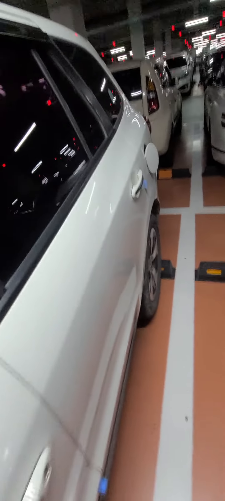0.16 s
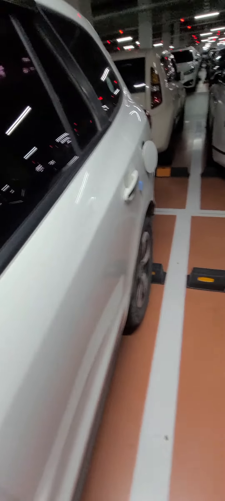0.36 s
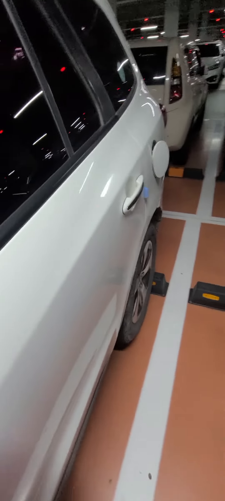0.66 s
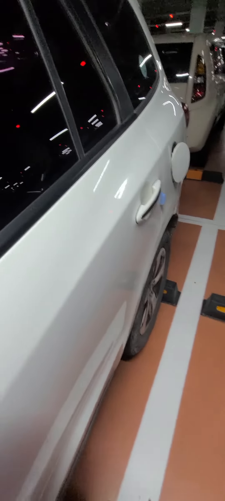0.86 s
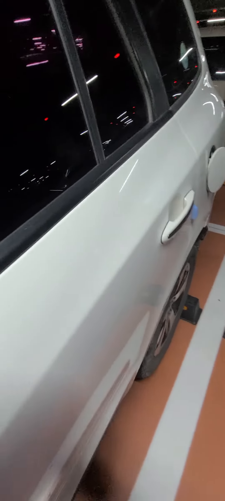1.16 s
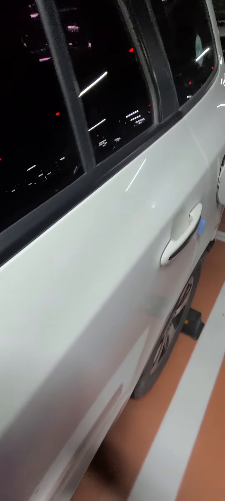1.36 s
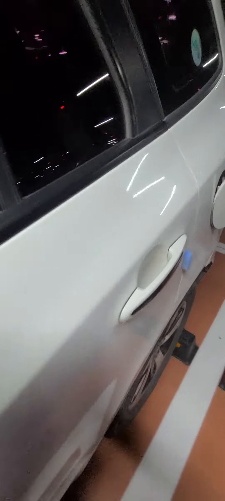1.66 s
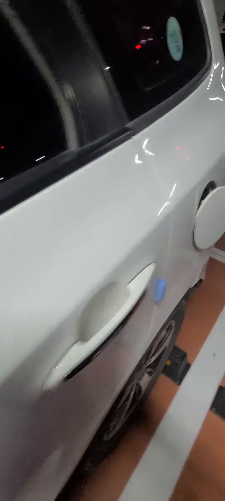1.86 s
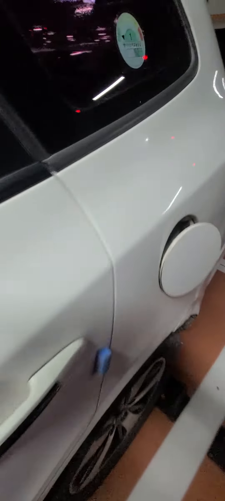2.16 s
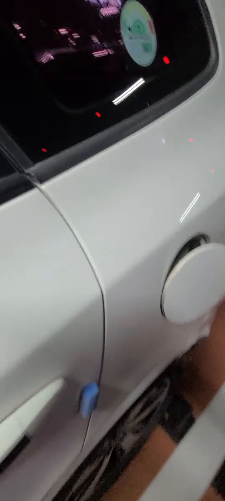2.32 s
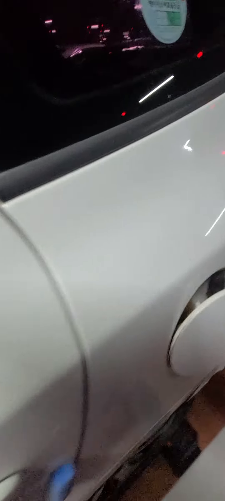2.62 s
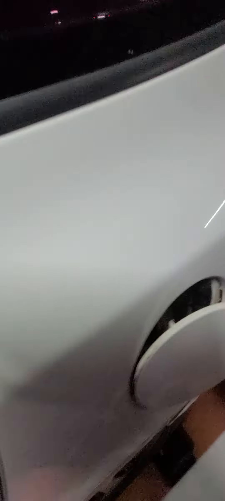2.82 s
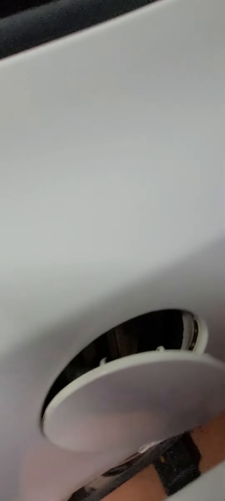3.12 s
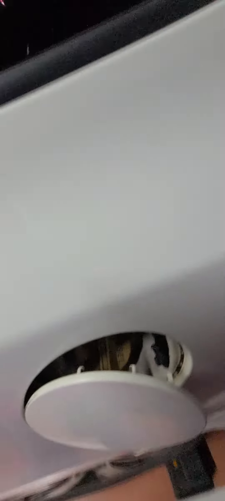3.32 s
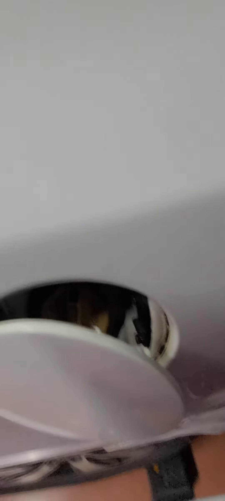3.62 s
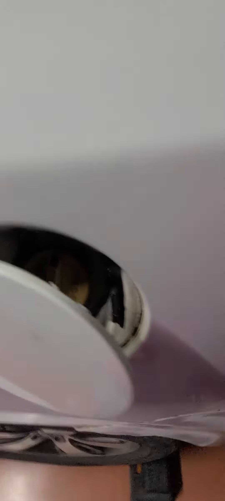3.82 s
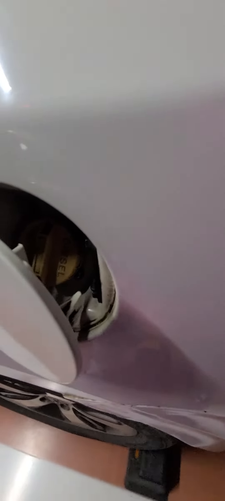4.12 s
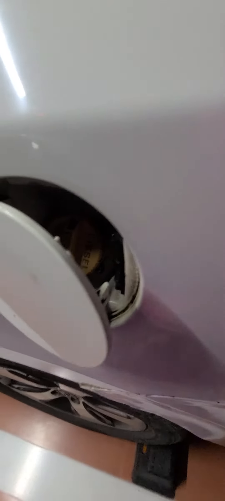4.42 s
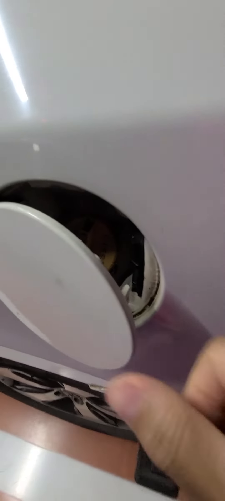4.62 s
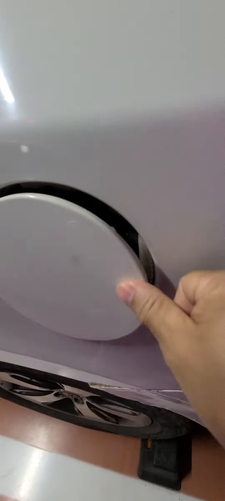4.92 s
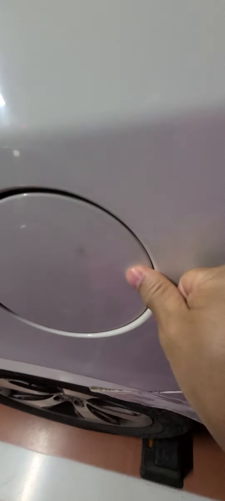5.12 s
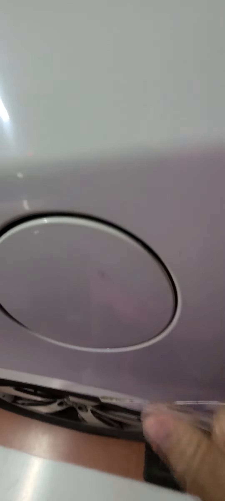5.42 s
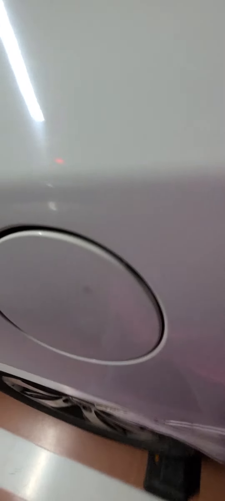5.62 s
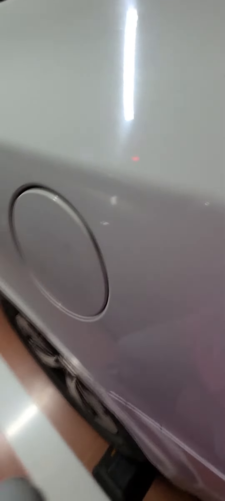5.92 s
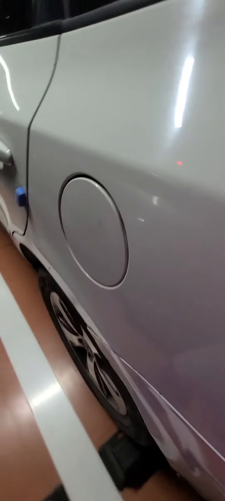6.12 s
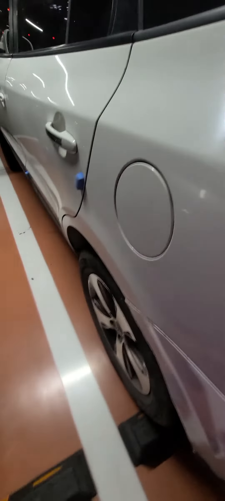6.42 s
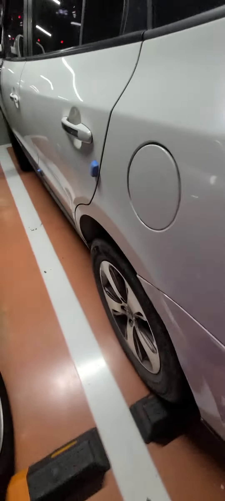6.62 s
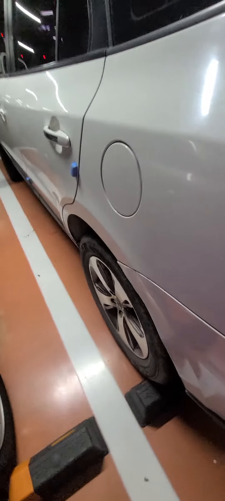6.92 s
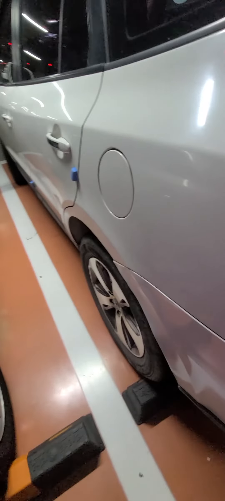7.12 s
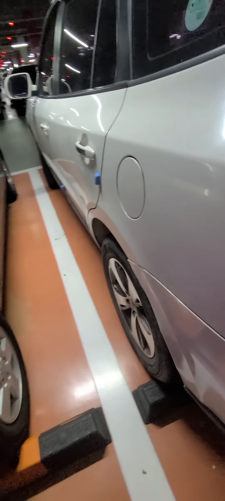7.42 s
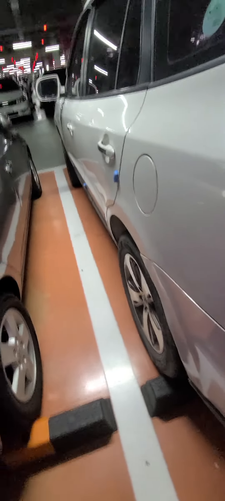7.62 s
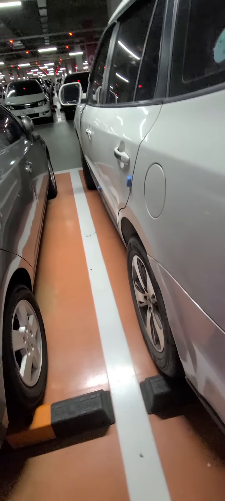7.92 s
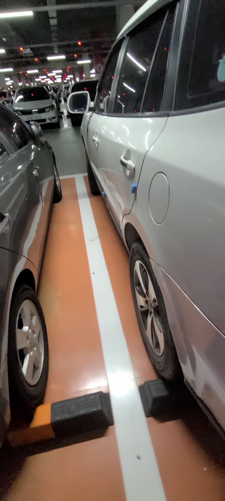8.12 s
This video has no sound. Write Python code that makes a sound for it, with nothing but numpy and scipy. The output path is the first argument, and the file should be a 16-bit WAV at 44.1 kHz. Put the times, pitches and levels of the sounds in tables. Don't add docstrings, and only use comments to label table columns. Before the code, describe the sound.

Very close stereo handheld microphone in a concrete garage. Fabric brushes and swishes, with dry snaps and sole ticks, one very sharp near two seconds. Clusters of crackles lead to a hard, hollow knuckle rap on car metal, then a softer knock, then a fuel flap pushed shut with a clack. Quieter swishes, a few faint ticks and two tiny key clinks follow over a faint low rumble.

```python
import sys
import numpy as np
from scipy import signal
from scipy.fft import rfft, irfft, next_fast_len
from scipy.io import wavfile
from scipy.ndimage import uniform_filter1d, map_coordinates

SR = 44100
rng = np.random.default_rng(int(sys.argv[2]) if len(sys.argv) > 2 else 0)


def ratio(d):
    e = np.asarray(d, float) / 20
    return 10 ** e


def materialize(psi):
    bounded = np.clip(np.atleast_2d(psi).T, -1, 1)
    quanta = np.round(bounded * 32767).astype(np.int16)
    wavfile.write(sys.argv[1], SR, quanta)


N = 364266

# (frequency [Hz], density [dB per Hz])
WEAVE_SPECTRUM = [(410, -50.5), (700, -10.5), (1050, -4), (2300, -7), (3190, -5.5), (5500, -16.5),
                  (7150, -22.5), (12100, -120)]
SHEEN_SPECTRUM = [(2240, -19.5), (3800, -7.5), (5000, -4), (7000, 0), (8300, -12.5), (11900, -10.5),
                  (15100, -14), (16400, -39)]
BODY_SPECTRUM = [(82, -50.5), (140, -22), (237, -12), (422, -9.5), (650, -11), (1100, -20.5), (1430, -13),
                 (2420, -120)]
RUMBLE_SPECTRUM = [(12, -44.5), (20, -20), (38, -4), (70, 1), (166, -13), (220, -11), (290, -32.5),
                   (480, -120)]
# (frequency [Hz], correlation [0-1])
PORT_LIKENESS = [(40, 0.23), (120, 0.64), (400, 1), (1500, 0.25), (4000, 0.15), (9000, 0.07), (15000, 0.16)]
# (frequency [Hz], level [dB])
CRACKLE_SPECTRUM = [(250, -29), (700, -3.5), (1500, 2.5), (3500, -3), (5000, -7.5), (8000, -27.5),
                    (16000, -62.5)]
EDGE_SPECTRUM = [(2500, -31.5), (5000, -6.5), (7200, 0), (8500, -13.5), (13000, -15), (16000, -30.5)]
# (frequency [Hz], t60 [s])
HALL_DECAY = [(150, 0.39), (1000, 0.21), (5000, 0.26), (14000, 0.04)]
# (time [s], left over right [dB])
BEARING = [(0.0, -9), (0.16, 3), (0.51, -7), (0.73, 6), (0.94, -17), (2.07, -3.5), (3.15, -10.5),
           (3.57, -5.5), (3.86, -15), (4.37, 2.5), (4.42, -19.5), (5.2, 2.5), (5.22, 5), (6.99, -4),
           (7.57, -14), (8.26, -4.5)]

# (peak time [s], rise [s], fall [s], swish [dB], sheen over swish [dB])
LOOSE_STROKES = [
    (.36, 0.057, .08, -60, -16),
    (.49, 0.11, 0.21, -46, -23.5),
    (.585, 0.06, 0.042, -45, -8.5),
    (1.39, 0.047, 0.3, -63.5, -3),
    (2.7, 0.049, 0.088, -47.5, -13),
    (3.11, 0.079, 0.13, -53.5, -17.5),
    (3.6, 0.26, 0.32, -56.5, -9),
    (4.07, 0.24, 0.173, -52, -10),
    (5.8, 0.071, 0.073, -48.5, -10),
    (6.7, 0.062, 0.039, -50, -16),
]
# (peak time [s], rise [s], fall [s], swish [dB], sheen over swish [dB])
TAUT_STROKES = [(0.0, .05, 0.16, -55, -16), (1.98, 0.22, 0.23, -39, -14), (2.3, 0.12, 0.99, -55.5, -10.5),
                (2.55, 0.11, 0.23, -50, -8.5), (2.92, 0.18, 0.23, -52, -2), (3.28, 0.21, 0.16, -41, -7),
                (3.88, 0.46, 0.21, -50.5, -3.5), (4.47, 0.12, 0.13, -58.5, -3.5),
                (5.5, 0.12, 0.29, -59, -4), (5.93, 0.11, 0.058, -48, -4.5), (6.26, 0.21, 0.24, -44, -7.5),
                (6.6, 0.12, 0.2, -51.5, -8.5), (6.85, 0.21, 0.3, -63, -1.5), (7.52, 0.36, 0.39, -61, -3.5),
                (8.11, 0.1, 0.1, -55, -11), (8.26, 0.2, 0.11, -72.5, 2)]
# (peak time [s], rise [s], fall [s], swish [dB], sheen over swish [dB])
SLEEVE_STROKES = [
    (.91, 0.058, 0.16, -62, -5),
    (1.02, 0.12, 0.16, -41, -10),
    (1.3, 0.19, 0.17, -42, -14),
]

# (time [s], peak level
# [dB], pitch [Hz], edge above 5 kHz over crackle [dB], hollow thud over crackle [dB])
SNAPS_AND_TICKS = [(0.385, -27, 1130, -17, -9.5), (0.513, -25, 1700, -32, -17), (0.641, -30, 1610, -30.5, -28),
                   (1.464, -22, 1210, -15, -18.5), (1.556, -23.5, 1060, -28, -13.5),
                   (1.6738, -26, 3020, -18, -10.5), (1.903, 0.5, 3500, -10.5, -24),
                   (2.3753, -6, 2020, -8, -11.5), (2.877, -19.5, 2700, -22, -15),
                   (2.8818, -17, 2760, -27.5, -13.5), (2.9222, -5.5, 2830, -21.5, -17),
                   (3.222, -31, 1410, -11.5, -10), (3.355, -17.5, 2770, -20, -11),
                   (3.3725, -12.5, 1910, -15, -11), (3.386, -8.5, 3000, -5.5, -9.5),
                   (3.396, -7.5, 2070, -22, -38), (3.5147, -11.5, 2520, -12, -11.5),
                   (3.642, -6, 1690, -4.5, -10), (4.0968, -41.5, 1180, -16, -1), (4.116, -40, 1590, -24.5, 3),
                   (4.925, -32.5, 1720, -12, -10), (5.473, -36, 2500, -25, -20), (6.504, -37.5, 1076, 5, -3),
                   (6.742, -34, 2766, -0.5, -22), (7.1952, -42, 992, -24, -10), (7.6853, -21, 1800, -11, -17),
                   (7.7272, -38, 4330, 4, -28), (7.745, -20.5, 1180, -30, -9), (7.742, -33, 2900, -12, -19),
                   (2.3764, -3.5, 3600, -15, -27), (7.836, -44.5, 1510, -18, -1), (6.472, -47, 500, -29, 3.5),
                   (7.521, -56, 496.4, -24, 2), (7.795, -59, 1400, -15, -8), (7.898, -50, 1500, -15.5, -2.5),
                   (7.965, -43.5, 1437, -12.5, -4), (8.036, -50, 1720, -17, -6.5), (8.19, -47.5, 460, -26, 1),
                   (0.152, -24, 930, -17, -8.5), (0.823, -49, 600, -18, 1.5), (1.131, -43, 650, -25, -6),
              (1.2072, -32, 1130, -23, -4.5), (1.256, -34.5, 890, -20, -3), (1.3785, -23, 1400, -43, -5),
              (1.76, -16, 3260, -16.5, -6), (1.767, -21, 450, -21, -14), (1.912, -18.5, 415, -29.5, -3),
              (1.717, -39, 2300, -7, -18.5), (1.789, -48, 500, -25, 6), (1.803, -21.5, 706, -34, -5.5),
              (1.818, -50, 500, -25, 2), (1.829, -32, 650, -20, -3), (1.839, -20, 2520, -18, -4.5),
              (1.861, -35, 700, -25, -3), (1.875, -34, 900, -20, 4), (1.881, -34.5, 547, -23, 6.5),
              (2.344, -26, 830, -25, -3), (2.448, -15.5, 3200, -15.5, 0), (2.464, -27.5, 805, -24, 0.5),
              (2.642, -25.5, 1210, -40, -5.5), (2.72, -27, 504, -26, 1.5), (2.7423, -20, 1290, -41, -8.5),
              (2.896, -22.5, 2100, -7, -18), (2.916, -21.5, 900, -25, -7), (3.037, -29.5, 1520, -22, -1.5),
              (3.086, -35, 600, -25, 1), (3.093, -25, 1350, -31, -1), (3.122, -26, 1200, -25, -5.5),
              (3.137, -27, 1920, -23, -5.5), (3.336, -24, 815, -25, -13), (3.5022, -12.5, 2000, -15, -7.5),
              (4.029, -42, 900, -25, 3), (4.042, -28, 1710, -22, -4.5), (4.831, -47, 700, -23, 6),
              (4.958, -36, 1050, -34, 3.5), (6.1795, -41, 1280, -13.5, 3), (7.03, -47.5, 1530, -25, 3),
              (7.1487, -34.5, 1450, -9, -6),]
# (time [s], peak level [dB], pitch
# [Hz], edge over crackle [dB], crackle length [s])
CONTACTS = [(1.239, -26, 5900, -8, 0.0074), (2.37, -15.5, 2030, -22, 0.029),
            (3.577, -8, 1500, -12.5, 0.031), (3.583, -8, 3100, -20.5, 0.053),
            (3.583, -11, 1500, -16, 0.049), (3.592, -13.5, 2220, -8.5, 0.03),
            (4.272, -23.5, 2700, -10, 0.047), (4.285, -15.5, 3100, 4.5, 0.02),
            (4.301, -23.5, 3830, -3.5, 0.034), (5.038, -12.5, 1240, -18.5, 0.058),
            (3.2115, -37.5, 7000, 0, .012), (5.166, -12, 1000, -27, 0.0075),
            (5.176, -16, 1684, -8.5, 0.034), (5.362, -41.5, 5500, -0.5, 0.028),
            (5.369, -44, 1100, -16.5, 0.061), (1.9045, -11, 3300, -21, .014),
            (2.3749, -7, 4870, -20, 0.0075), (2.923, -16, 1230, -18.5, 0.0069),
            (2.389, -30.5, 900, -21, 0.016), (3.574, -29, 4970, -0.5, 0.027),
            (5.06, -39.5, 4000, -2, 0.065), (3.109, -31, 2700, -20, .012)]
# (time [s], peak level [dB], pitch [Hz])
HAND_PUSHES = [(1.229, -34.5, 70.0), (0.514, -51, 97), (1.39, -41, 129), (1.461, -39, 65), (1.759, -35, 85),
               (1.904, -34, 81), (2.449, -35.5, 174), (2.719, -33, 78), (2.919, -25, 72.3),
               (3.083, -27.5, 72.5), (3.108, -25.5, 78), (3.367, -30.5, 198), (3.51, -28.5, 67),
               (3.521, -36.5, 280), (3.931, -46, 183), (3.98, -47, 221), (4.032, -39.5, 178.5),
               (5.43, -38.5, 104.4), (5.717, -50, 51.1), (5.929, -39.5, 66.3), (6.487, -45.5, 79.6),
               (7.189, -45, 131), (0.149, -46, 151), (3.385, -32, 150), (7.15, -42, 90),
               (7.481, -47.5, 104.3), (7.591, -48, 120), (7.69, -43.5, 108.3), (3.12, -30, 90)]
# (start [s], end [s], pitch [Hz], level [dB])
SEAM_DRAGS = [(0.42, 0.538, 1700, -48.5), (.54, 0.585, 1200, -40), (0.98, 1.25, 457, -51.5),
              (1.949, 2.145, 2020, -41), (3.236, 3.325, 1830, -36), (0.39, 0.53, 2200, -53.5),
              (3.556, 3.58, 780, -47), (3.25, 3.31, 2560, -40.5), (.9, 0.94, 3500, -49),
              (7.179, 7.23, 1000, -55.5), (8.027, 8.156, 1960, -58.5), (5.132, 5.175, 3440, -48),
              (5.2, 5.4, 1320, -54.5), (8.07, 8.12, 3400, -58), (4.29, 4.355, 1500, -50),
              (.424, .432, 1500, -48), (.478, .488, 2200, -44.5), (.604, .62, 1100, -50),
              (4.487, 4.498, 1000, -60)]
# (start [s], length [s], from [Hz], to [Hz], peak level [dB])
RIB_SLIDES = [
    (3.07, .18, 11800, 14800, -51),
    (3.28, .055, 4800, 7000, -38),
    (3.295, .03, 10500, 12500, -50),
    (8.155, .1, 6850, 6850, -58),
    (8.18, .055, 9800, 9600, -65),
    (8.17, .065, 14000, 14200, -63),
]
# (time [s], peak level [dB], pitch [Hz], t60 [s])
DAMPED_TAPS = [(5.037, -27, 513, 0.063), (5.04, -38.5, 600, 0.24), (5.039, -38, 350, 0.29),
               (5.046, -23.5, 189, 0.13), (5.129, -24.5, 510, 0.049), (5.136, -26.5, 209, 0.17),
               (3.578, -13, 718, 0.034), (5.335, -36, 683, 0.074), (5.362, -25.5, 179, 0.16),
               (5.338, -27.5, 405, 0.24), (5.367, -7.5, 451, 0.079), (6.142, -37.5, 323, 0.18)]

# (time [s], peak level [dB], contact time [s])
FIRST_BLOWS = [
    (3.589, -7, 0.00037),
    (3.595, -7, 0.00091),
    (3.602, -8, .002),
    (3.624, -17, .006),
]
SECOND_BLOWS = [
    (4.272, -27, 0.0022),
    (4.284, -6, 0.0052),
]
FLAP_BLOWS = [
    (5.157, -24.5, 0.0046),
    (5.1671, -6, 0.00036),
    (5.1734, -10.5, 0.001),
]
# (frequency [Hz], level [dB], t60 [s])
FIRST_MODES = [(108.3, -13.5, 0.38), (189.4, -16.5, 0.35), (315, 5.5, 0.1), (405, 11.5, 0.037),
               (483.6, 10.5, 0.073), (713, -14.5, 0.15), (808, -22, 0.35)]
SECOND_MODES = [(129, -10.5, 0.29), (174, -15, 0.35), (246, -26, 0.51), (307, -7, 0.24),
                (340.8, 2.5, 0.084), (405, -4, 0.15), (468.7, 4.5, 0.2), (646, -30, 0.13), (800, -37, 0.17),
                (890, -39, 0.18), (1180, -43.5, 0.18), (1398, -23.5, 0.077)]
FLAP_MODES = [(136, -24.5, 0.21), (179.2, -21, 0.28), (282.5, -16.5, 0.16), (415, -2.5, 0.29),
              (450, 3, 0.07), (496, -8, 0.21), (672, 2, 0.092), (723, -5, .11), (980, -2.5, 0.048),
              (1134, 0.5, 0.043), (1390, -17, 0.12), (1630, -6, 0.12), (1660, -37.5, .3)]
WING_MODES = [(487, -28.5, 0.94), (304, -39, 0.85)]

# (time [s], peak level [dB])
KEY_CLINKS = [
    (5.699, -43),
    (6.797, -30.5),
]
# (frequency [Hz], level [dB], t60 [s])
KEY_MODES = [(4705, -17, 0.061), (6370, 1.5, 0.02), (9080, -10, 0.024), (10900, -2, 0.014),
             (11760, -14.5, 0.064), (12600, -5, 0.04)]

LOOSE_HZ, TAUT_HZ = (1350, 1720), (2296, 3000)
SLEEVE_HZ = (760, 1210, 1740, 2140, 2670, 3120, 3750)
LOOSE_BODY_DB, TAUT_BODY_DB, SLEEVE_BODY_DB = -26.5, -13.5, -10.5
FOLD_WIDTH, SLEEVE_WIDTH = 0.42, 0.064
FOLD_RING, SLEEVE_RING = 0.63, 1.75
AWAY_S, AWAY_DB = 5.2, 0.5
TAIL_DB, TAIL_RISE_S, TAIL_FALL_S, MURMUR_TOP_HZ = -41.5, 0.093, 0.56, 543
SHAKE_DB, SHAKE_S, FAN_DB = -20.5, 0.072, -64
SNAP_S, STEP, SPREAD = 0.012, 17, 0.98
CONTACT_THUD_DB, THUD_DB_PER_OCTAVE = -3, -18
SLIPS_PER_S, SCRAPE_RISE = 700, 1.093
TAP_ROUGH_DB, TAP_PUFF_DB = 2, -14
PORT_LAG = 19


def unit(x):
    return x / np.sqrt(np.mean(x ** 2) + 1e-20)


def along(points, hz):
    f, v = np.transpose(points)
    return np.interp(np.log(hz + 1), np.log(f + 1), v)


def wobble(rate):
    coarse = np.arange(0, N + 16, 16)
    knots = rng.standard_normal(int(N * rate / SR) + 4)
    return np.interp(np.arange(N), coarse, map_coordinates(knots, [coarse * rate / SR]))


def filtered(x, response):
    n = x.shape[-1]
    m = next_fast_len(n + min(n // 4, 4096))
    return irfft(rfft(x, m) * response(np.fft.rfftfreq(m, 1 / SR)), m)[..., :n]


def peak(f, hz, width_hz):
    return 1j * f * width_hz / (hz * hz - f * f + 1j * f * width_hz)


def add(out, s, pair, lag):
    for ch, shift in enumerate((lag / 2, -lag / 2)):
        part = out[ch, max(round(s * SR + shift), 0):][:pair.shape[1]]
        part += pair[ch, :len(part)]


def swells(peak_s, rise_s, fall_s, db):
    peak_s, rise_s, fall_s, db = [np.reshape(v, (-1, 1)) for v in (peak_s, rise_s, fall_s, db)]
    now = np.arange(0, N / SR + .002, .002)
    since = now - peak_s
    width = np.maximum(np.where(since < 0, rise_s, fall_s), .01)
    power = ratio(db - 20 * (since / width) ** 2) ** 2
    return np.interp(np.arange(N) / SR, now, np.sqrt(np.sum(power, 0)))


def rush(spectrum, patchy_db, grain_db, pan_db):
    grain = ratio(grain_db * wobble(400))
    z = signal.stft(grain * rng.standard_normal((2, N)), nperseg=512)[2]
    field = uniform_filter1d(rng.standard_normal(z.shape[1:]), size=3, axis=0)
    field = uniform_filter1d(field, size=10, axis=1)
    pair = signal.istft(z * ratio(patchy_db * unit(field)), nperseg=512)[1][:, :N]

    def mid_side(hz):
        angle = np.arccos(np.clip(along(PORT_LIKENESS, hz), -1, 1)) / 2
        return ratio(along(spectrum, hz)) * [np.cos(angle), np.sin(angle)]

    mid, side = filtered(pair, mid_side)
    left = np.roll(mid + side, PORT_LAG)
    return unit(np.array([left * ratio(pan_db / 2), (mid - side) * ratio(-pan_db / 2)]))


def clothes():
    flutter = wobble(30)
    cloth = rush(WEAVE_SPECTRUM, patchy_db=3, grain_db=1.5, pan_db=-5.5)
    weave, shine, weight = ratio(-67.5) * cloth, ratio(-67.5), ratio(-65.5)
    folds = [(LOOSE_STROKES, LOOSE_HZ, FOLD_WIDTH, FOLD_RING, LOOSE_BODY_DB),
             (TAUT_STROKES, TAUT_HZ, FOLD_WIDTH, FOLD_RING, TAUT_BODY_DB),
             (SLEEVE_STROKES, SLEEVE_HZ, SLEEVE_WIDTH, SLEEVE_RING, SLEEVE_BODY_DB)]
    for strokes, fold_hz, width, ring, body_db in folds:
        s, rise, fall, db, sheen_db = np.transpose(strokes)
        stroke = swells(s, rise, fall, db)
        fold = filtered(cloth, lambda f: 1.35 + ring * sum(peak(f, hz, width * hz) for hz in fold_hz))
        weave = weave + fold * stroke * ratio(1.5 * flutter - 4.5)
        shine = shine + swells(s, rise, fall, db + sheen_db + 4.0)
        weight = weight + swells(s, rise, fall, db + body_db + AWAY_DB * (s > AWAY_S))

    s, db, _ = np.transpose([*FIRST_BLOWS, *SECOND_BLOWS, *FLAP_BLOWS])
    murmur = swells(s + TAIL_RISE_S, TAIL_RISE_S, TAIL_FALL_S, db + TAIL_DB)
    sheen = rush(SHEEN_SPECTRUM, patchy_db=2.2, grain_db=1.5, pan_db=-6) * ratio(.9 * flutter)
    hum = rush(BODY_SPECTRUM, patchy_db=2, grain_db=1, pan_db=-5)
    body = weight * ratio(2 * wobble(25)) * hum
    body += murmur * filtered(hum, lambda f: 1 / (1 + (f / MURMUR_TOP_HZ) ** 8))

    s, db, _ = np.transpose(HAND_PUSHES)
    shake = ratio(FAN_DB) + swells(s, SHAKE_S, SHAKE_S, db + SHAKE_DB) + 0.27 * murmur + 0.18 * weight
    rumble = rush(RUMBLE_SPECTRUM, patchy_db=.5, grain_db=0, pan_db=-4) * ratio(2 * wobble(18))
    return weave + shine * sheen + body + shake * rumble


def snaps():
    lead = .012
    release = round(lead * SR)
    out, t = np.zeros((2, N)), np.arange(SR // 12) / SR
    after = np.maximum(t - lead, 0)
    top = lambda x: x / np.abs(x).max()
    rows = [(*row[:4], SNAP_S, row[4]) for row in SNAPS_AND_TICKS]
    for row in CONTACTS:
        rows.append((*row, CONTACT_THUD_DB + THUD_DB_PER_OCTAVE * np.log2(row[2] / 1200)))
    for s, db, hz, edge_db, length, thud_db in rows:
        noise, chance = rng.standard_normal((4, len(t))), rng.random(2)
        on_car = 3.55 < s < 5.4
        near = .35 if on_car else 1
        loading = near * 0.1 * np.exp((t - lead) / 0.0055)
        decay = ratio(-60 * after / length) + near * 0.03 * ratio(-60 * after / 0.15)
        noise[0, release] = STEP
        burst = (noise[0] + SPREAD * noise[1:3]) * np.where(t < lead, loading, decay)

        def crack_response(f):
            broad = 0.89 * ratio(along(CRACKLE_SPECTRUM, f)) / (1 + (f / (2.8 * hz)) ** 2)
            return peak(f, hz, .5 * hz) ** 2 + broad * 1j * f / (.45 * hz + 1j * f)

        crack = filtered(burst, crack_response)
        edge = filtered(burst, lambda f: ratio(along(EDGE_SPECTRUM, f)))
        noise[3, release + 1] = 9
        hollow = noise[3] * (t > lead) * ratio(-60 * after / (length + 0.022))
        thud = filtered(hollow, lambda f: peak(f, 440, 600) ** 2)
        pair = top(crack) + ratio(edge_db) * top(edge) + ratio(thud_db + 0.5) * top(thud)
        pan_db = np.interp(s, *np.transpose(BEARING)) + 4.0 * (chance[0] - .5)
        lag = 3 if on_car else 10 + 9 * chance[1]
        add(out, s - lead, ratio(db - 1.5) * pair * ratio([[pan_db / 2], [-pan_db / 2]]), lag)
    return out


def pushes():
    out, t = np.zeros((2, N)), np.arange(SR // 12) / SR
    for s, db, hz in HAND_PUSHES:
        onset = 1 - np.exp(-t / 0.00081)
        push = np.sin(2 * np.pi * hz * t) * ratio(db + 7.5 - 60 * t / 0.038) * onset
        add(out, s, push * ratio([[-2.5], [2.5]]), PORT_LAG)
    return out


def hall(x):
    hz, t, z = signal.stft(rng.standard_normal((2, SR // 2)), SR, nperseg=256)
    tail = signal.istft(z * ratio(-60 * t / along(HALL_DECAY, hz)[:, None]), SR, nperseg=256)[1]
    late = np.pad(x, ((0, 0), (200, 0)))
    return signal.fftconvolve(late, tail / np.linalg.norm(tail[0]), axes=1)[:, :N]


def scrapes():
    out = np.zeros((2, N))
    for start, end, hz, db in SEAM_DRAGS:
        u = np.linspace(0, 1, round((end - start) * SR))
        slips = (rng.random(len(u)) < SLIPS_PER_S / SR) * rng.standard_normal(len(u))
        pitches = hz / SCRAPE_RISE ** .5, hz * SCRAPE_RISE ** .5
        slack, tight = [filtered(slips, lambda f: peak(f, fold, 0.19 * fold) ** 2) for fold in pitches]
        ring = unit((1 - u) * slack + u * tight)
        swell = np.sqrt(np.abs(np.sin(np.pi * u)))
        add(out, start, ratio(db) * swell * ring * ratio([[-3], [3]]), PORT_LAG)
    return out


def zips():
    out = np.zeros((2, N))
    level_db, waver = 4 * wobble(250) - 2, 1 + .012 * wobble(300)
    for s, length, from_hz, to_hz, db in RIB_SLIDES:
        u = np.linspace(0, 1, round(length * SR))
        at = slice(round(s * SR), round(s * SR) + len(u))
        speed = np.sin(np.pi / 2 * (u / .85) ** 1.6) ** 2
        swell_db = db - 14 * np.abs(u - .7) + level_db[at]
        hz = (from_hz + (to_hz - from_hz) * speed) * waver[at]
        line = ratio(swell_db) * np.sin(2 * np.pi * np.cumsum(hz) / SR)
        add(out, s, line * np.array([[0.66], [1]]), PORT_LAG)
    return out


def taps():
    out, t = np.zeros((2, N)), np.arange(SR // 4) / SR
    for s, db, hz, t60 in DAMPED_TAPS:
        places = [[np.zeros(len(t)), np.ones(len(t))], [t * 140, t * 140]]
        uneven = map_coordinates(rng.standard_normal((2, 40)), places)
        rough = ratio(TAP_ROUGH_DB * uneven[0] * np.minimum(t / 0.0097, 1))
        swing = rough * np.sin(2 * np.pi * hz * t + 0.29 * uneven[1])
        swing += 0.25 * np.sin(2 * np.pi * .66 * hz * t)
        puff = unit(filtered(rng.standard_normal((2, len(t))), lambda f: peak(f, hz, 0.62 * hz) ** 2))
        pair = (swing + ratio(TAP_PUFF_DB) * puff) * ratio([[-2], [2]])
        add(out, s, ratio(db + 2.5 - 60 * t / t60) * pair * (1 - np.exp(-t / .002)), -4)
    return out


def knocks(blows, modes, rattle_db, tinny_db, lag):
    out, t = np.zeros((2, N)), np.arange(SR // 2) / SR
    hz, level_db, t60 = np.transpose(modes)[:, :, None]
    for s, db, contact in blows:
        twin_hz = hz * (1 + rng.choice([-1, 1], hz.shape) * rng.uniform(0.031, 0.088, hz.shape))
        swing = np.sin(2 * np.pi * hz * t) + 0.32 * np.sin(2 * np.pi * twin_hz * t)
        knots = rng.standard_normal((len(hz), 20))
        drift = np.array([np.interp(t, np.linspace(0, .5, len(row)), row) for row in knots])
        unsteady_db = 4 * drift * np.minimum(t / .05, 1)
        onset = 1 - np.exp(-t / max(contact, 1e-4))
        ring = ratio(level_db + unsteady_db - 60 * t / t60) * swing * onset
        spread = rng.normal(0, 2.0, hz.shape)
        pair = np.array([np.sum(ring * ratio(spread - 1.3), 0), np.sum(ring * ratio(1.3 - spread), 0)])
        noise = rng.standard_normal((3, len(t)))
        rattle = filtered((noise[0] + 0.22 * noise[1:]) * ratio(-60 * t / 0.15),
                          lambda f: peak(f, 290, 500) ** 2 + ratio(tinny_db) * peak(f, 1300, 770) ** 2)
        add(out, s, ratio(db) * (pair / np.abs(pair).max() * 2.11 + ratio(rattle_db) * rattle), lag)
    return out


def keys():
    out, t = np.zeros((2, N)), np.arange(SR // 8) / SR
    for s, db in KEY_CLINKS:
        ring = np.zeros(len(t))
        for hz, level, t60 in KEY_MODES:
            ring += ratio(level + rng.normal(0, 5.1) - 60 * t / t60) * np.sin(2 * np.pi * hz * t)
        add(out, s, ratio(db - 5.5) * ring * ratio([[-3], [3]]), PORT_LAG)
    return out


def scene():
    metal = knocks(FIRST_BLOWS, [*FIRST_MODES, *WING_MODES], rattle_db=2.5, tinny_db=-24.5, lag=3)
    metal += knocks(SECOND_BLOWS, [*SECOND_MODES, *WING_MODES], rattle_db=3.5, tinny_db=-16.0, lag=0)
    metal += knocks(FLAP_BLOWS, FLAP_MODES, rattle_db=10.0, tinny_db=-45.5, lag=-10.0)
    near = snaps() + pushes() + keys()
    hits = metal + taps() + near + hall(ratio(-15.0) * metal + ratio(-23.0) * near)
    radiated = filtered(hits, lambda f: (1j * f / (60 + 1j * f)) ** 2)
    return radiated + zips() + clothes() + scrapes()


def top_cut(x):
    return signal.sosfilt(signal.butter(12, 16500, fs=SR, output="sos"), x)


def record(dry):
    held = dry / (1 + np.abs(dry / .99) ** 8) ** (1 / 8)
    held = filtered(held, lambda f: 1 / (1 + (f / 15900) ** 60))
    return top_cut(held)


dry = scene()
out = record(dry)
materialize(out)
```